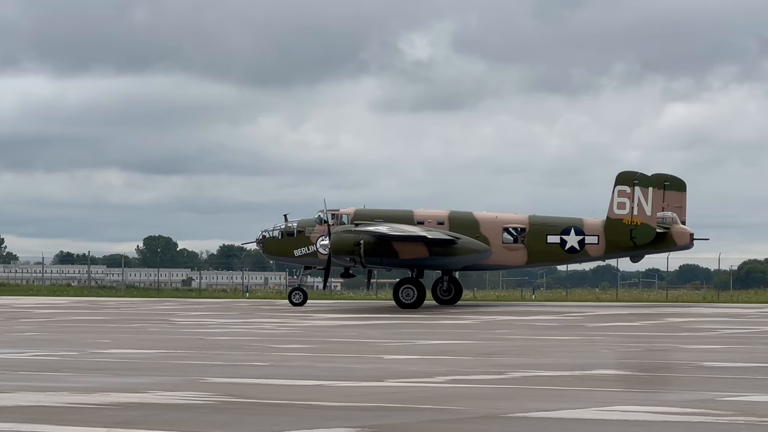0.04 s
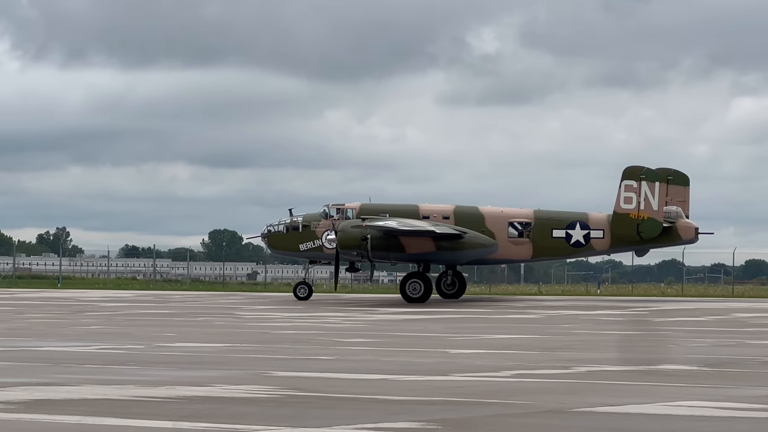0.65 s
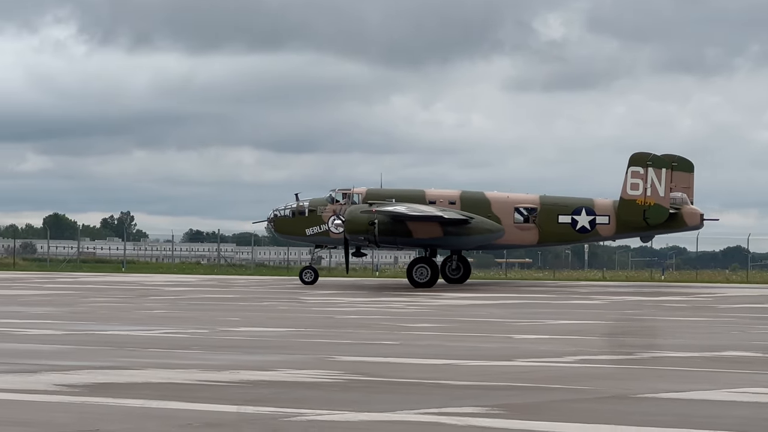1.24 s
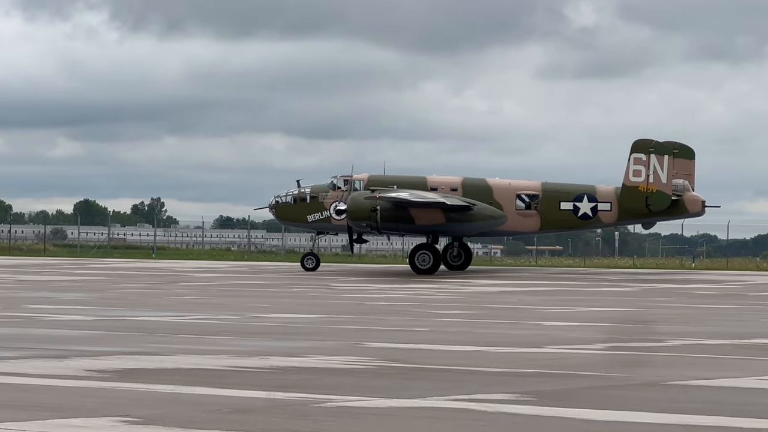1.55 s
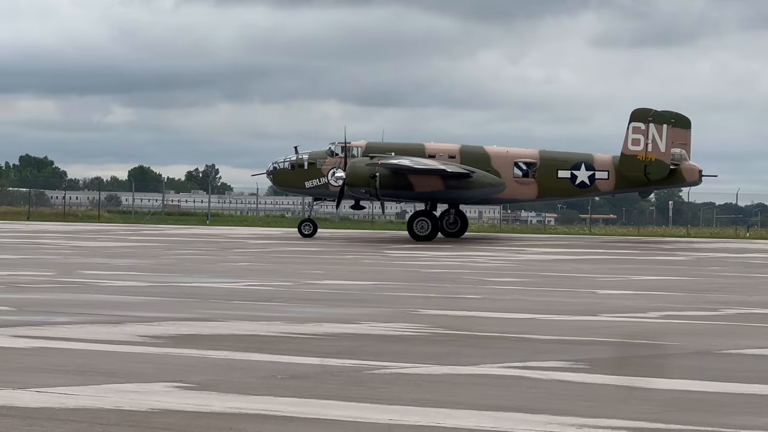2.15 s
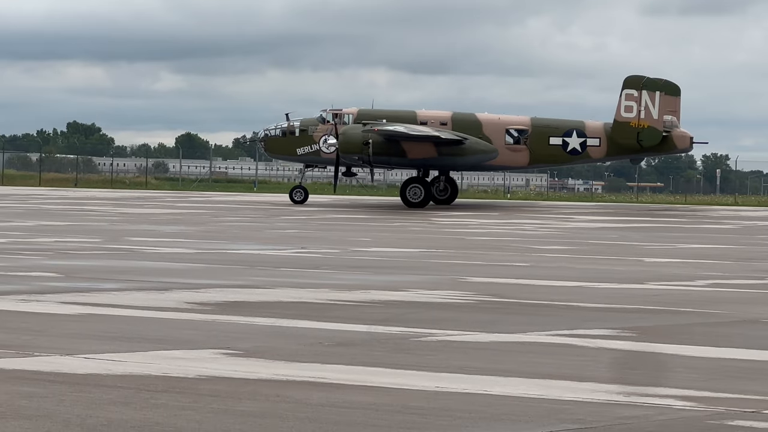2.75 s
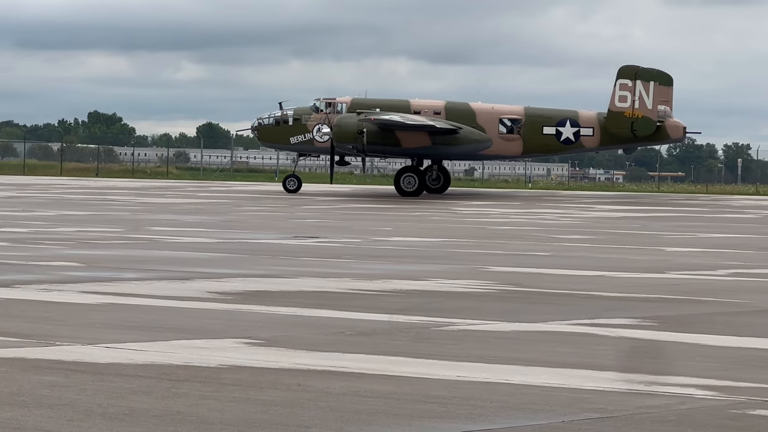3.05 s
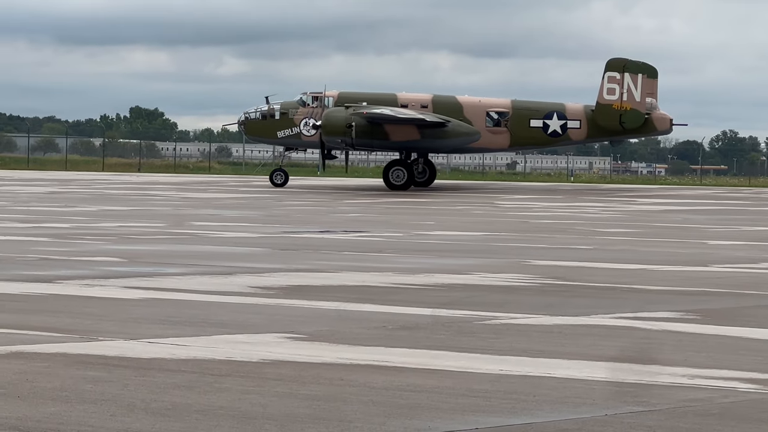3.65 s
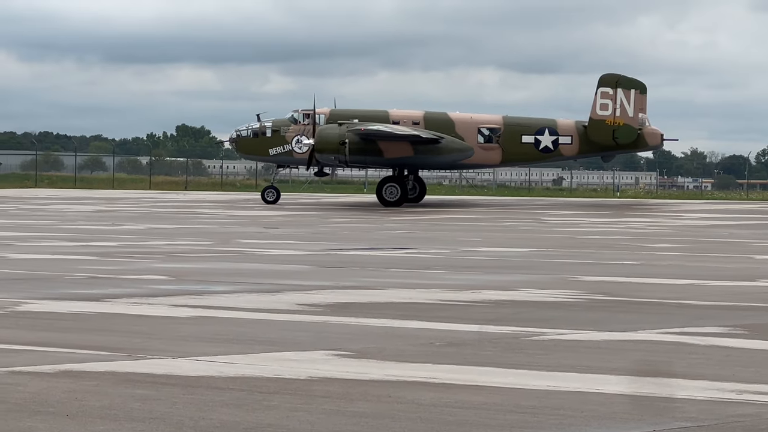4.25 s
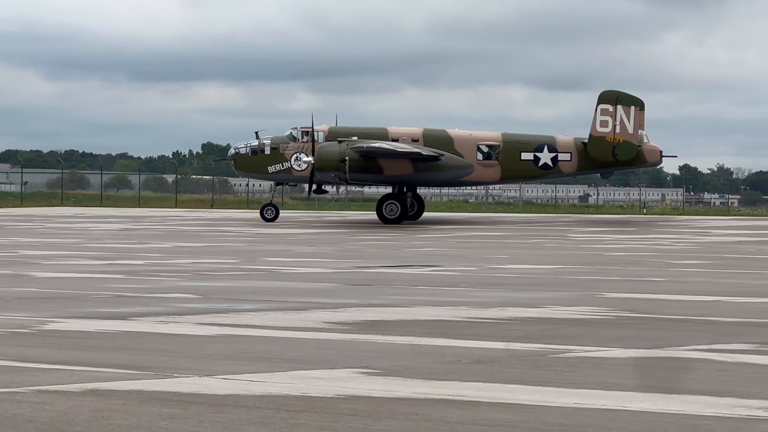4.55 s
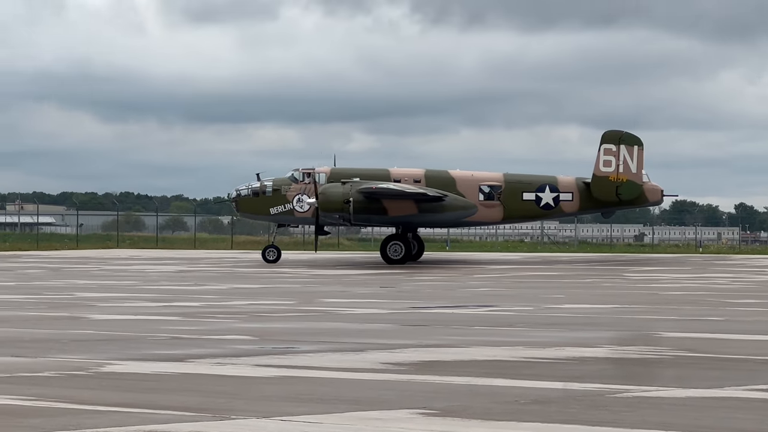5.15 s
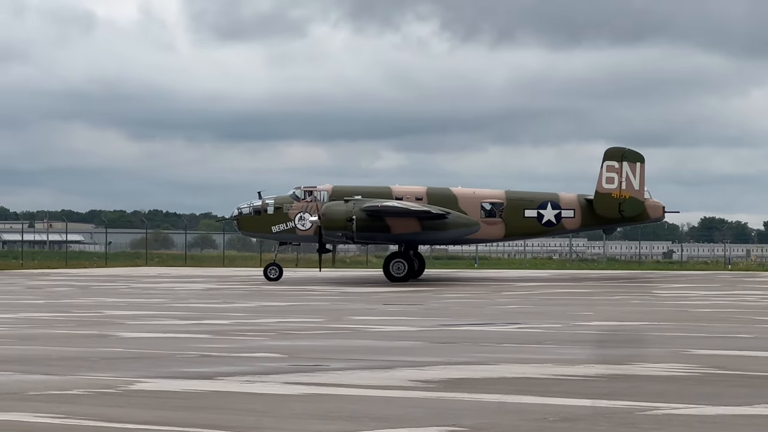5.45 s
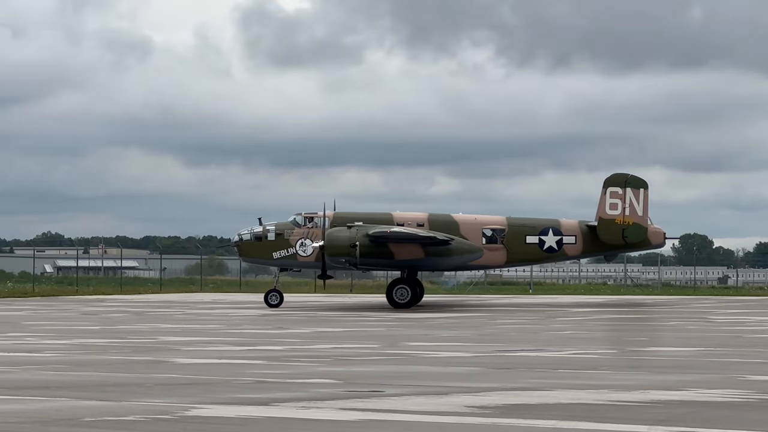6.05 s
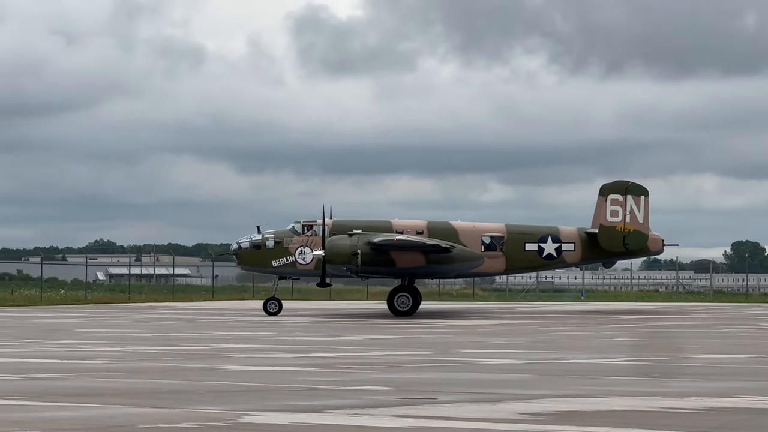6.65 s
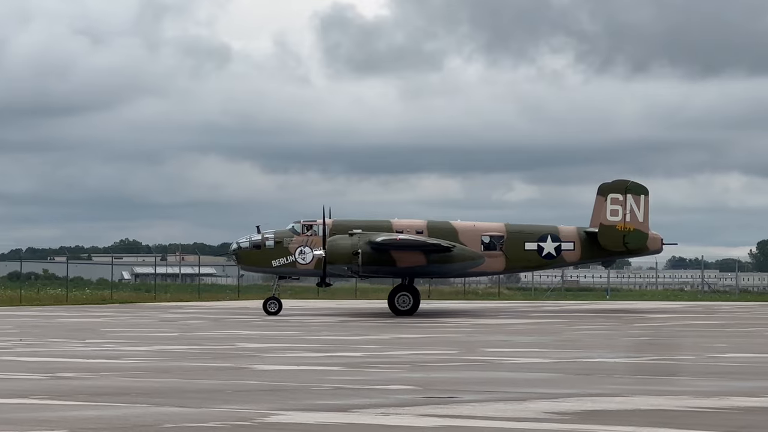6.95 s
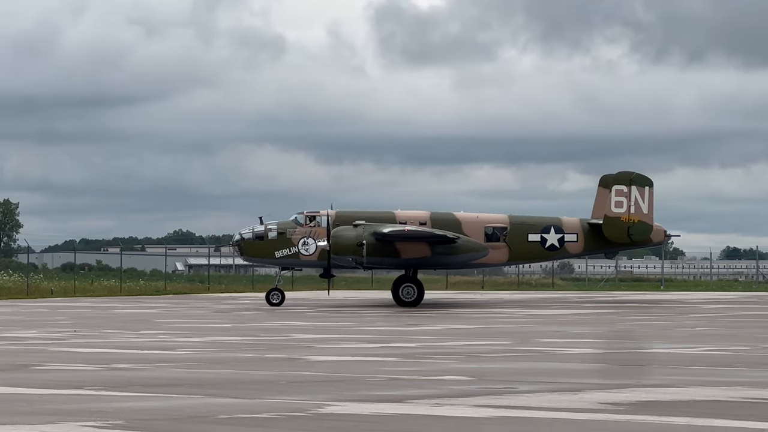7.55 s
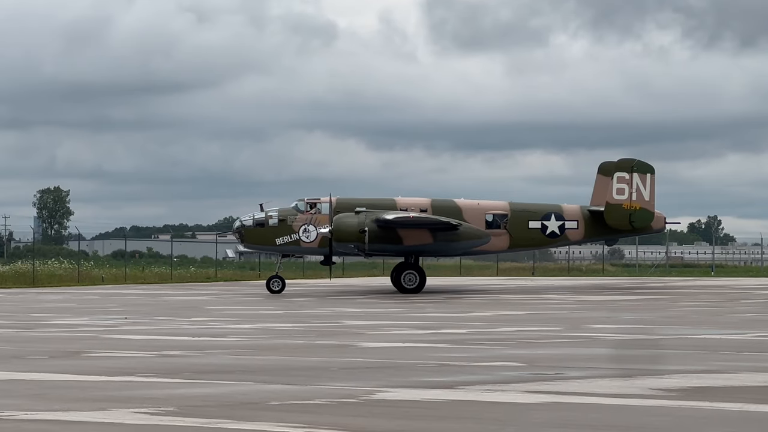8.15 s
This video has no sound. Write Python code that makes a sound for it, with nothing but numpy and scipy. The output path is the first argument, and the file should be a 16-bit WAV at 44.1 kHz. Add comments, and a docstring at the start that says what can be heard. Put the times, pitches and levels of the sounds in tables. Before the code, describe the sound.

A taxiing propeller plane idles with a loping, barking exhaust and low burble, while gusty wind thumps on the microphone.

```python
"""Two idling radial engines bark and spit in a loping beat as a propeller plane taxis slowly past.
Seven cylinders fire in turn through short exhaust pipes, over a low burble of merging pressure pulses,
throaty coughs, a light metallic clatter and churned air. A faint whine comes and goes, dull thuds
sound now and then, and unburnt fuel spits at about 1.5 seconds. Gusts of wind on the open airfield
buffet the microphone and push it into overload."""
import sys
import numpy as np
from scipy import signal
from scipy.fft import rfft, irfft
from scipy.io import wavfile
from scipy.ndimage import uniform_filter1d

SR = 44100
rng = np.random.default_rng(int(sys.argv[2]) if len(sys.argv) > 2 else 0)


def wav_out(sig):
    """Save sig, one row per channel (or a flat mono array), as 16-bit PCM at SR to the path in sys.argv[1]."""
    wavfile.write(sys.argv[1], SR, np.round(np.clip(np.atleast_2d(sig).T, -1, 1) * 32767).astype(np.int16))


N = 366471
T = np.arange(N) / SR
FIRINGS_PER_S, FIRST_FIRING_S = 33.5973, -0.0431

# The seven near cylinders in firing order. Each row: delay in seconds, bark level in dB,
# bark pitch in Hz, rasp level in dB, hiss level in dB, hiss pitch in Hz.
CYLINDERS = [(0, -29, 660, -37, -34, 7100), (.002, -33.5, 1410, -29, -34.5, 6200),
             (.002, -43, 1400, -40, -39, 6700), (.002, -47, 1030, -35.5, -51, 5600),
             (-.002, -26.5, 1020, -36.5, -31.5, 5900), (.001, -37.5, 1300, -37, -42, 6900),
             (-0.024, -69, 1100, -63, -63, 6600)]
# The idle is not quite steady. Each row: time in seconds, lag behind an even beat in seconds.
CRANK_LAG = [(0, 0.0029), (.4, 0.0004), (1, -0.008), (2, -0.0048), (3, 0.00061), (5, 0.00043), (6.4, .002),
             (7.2, -0.0041), (8.31, -0.0051)]
# The engine's sound as the plane turns. Each row: time in seconds, then the dB added to the burble,
# the bark, the rasp and the hiss.
ENGINE_LEVELS = [(0, 0.5, 7, 11, 0), (.6, 3.5, 2, -4.5, 0.5), (1.1, 0.5, -3.5, 1.5, -0.5),
                 (1.8, 2, -3, -5.5, -2), (2.4, -.5, 5.5, 1.5, 0), (3.1, 1, 2.5, -4, -0.5),
                 (3.6, -1.5, 5.5, -7, -3.5), (4.25, 3, 3, 5.5, -1), (4.6, -1, 1.5, -7, -4),
                 (5.35, -0.5, 4, -5, 3), (6, -1, 6.5, -4, -4), (6.8, 0, -0.5, -5.5, -4.5),
                 (7.3, 1.5, 7, -4, -4), (7.7, -3, 9.5, -8, 2.5), (8.31, 4, -15, -2, -2)]
# Firings that stand out. Each row: time in seconds, bark level in dB, bark pitch in Hz, crack level
# in dB, crack pitch in Hz, rasp level in dB, hiss level in dB, hiss pitch in Hz.
HARD_POPS = [(0.077, -30.5, 1280, -35, 2130, -27, -22, 6960),
             (0.168, -24.5, 1250, -25, 1804, -26, -25, 5350),
             (0.285, -27, 1168, -37, 2120, -27, -27.5, 7100),
             (0.375, -24, 1200, -37, 1985, -35, -30.5, 4870), (0.49, -33, 1173, -45, 1980, -36, -24, 7000),
             (0.583, -26, 1130, -37, 2130, -29, -22.5, 5000),
             (0.614, -31, 1170, -42, 2260, -22.5, -25.0, 7100),
             (0.697, -40, 1025, -47, 2170, -27, -28.5, 6900),
             (0.791, -23.5, 1200, -34, 1750, -31, -23, 8450),
             (0.906, -27, 1115, -38, 2230, -38.0, -30.0, 4600),
             (0.981, -28, 1158, -48, 2310, -25.5, -23.5, 8650),
             (1.112, -45.0, 1110, -46.5, 2150, -45.0, -26, 8900),
             (1.207, -22.5, 1103, -35, 2100, -36, -26, 4760),
             (1.83, -21, 1153, -33, 1870, -42.0, -32.5, 8200),
             (2.245, -22.5, 1170, -25.5, 2006, -31, -26, 7400),
             (2.278, -28, 1300, -36, 1860, -24.0, -33, 8100),
             (2.365, -30, 1190, -32.5, 1985, -30.5, -31, 7200),
             (2.457, -22, 1286, -33, 1850, -28, -29.5, 4800),
             (2.487, -31, 1317, -41, 2040, -29.5, -43, 5200), (2.664, -24, 1182, -24, 1783, -34, -26, 5030),
             (2.782, -27, 1035, -40, 1980, -38, -28.0, 6760),
             (2.875, -16, 1248, -21, 1773, -35.0, -23.5, 7900),
             (2.907, -24, 1270, -39, 1900, -40, -31, 6200),
             (3.082, -19.5, 1230, -23, 1895, -27, -36.0, 7500),
             (3.117, -25, 1213, -27.5, 1746, -29.0, -32, 6600),
             (3.2, -37, 1120, -29, 1875, -34.0, -22, 7300),
             (3.293, -22.5, 1187, -21, 1926, -26.5, -29.5, 8700),
             (3.407, -27.5, 1070, -27, 1950, -32.0, -29.5, 5660),
             (3.499, -22, 1126, -33, 2030, -36, -36, 5800), (3.535, -22.5, 1440, -23, 1772, -32, -33, 6400),
             (3.619, -24, 1170, -28, 1900, -46.0, -31, 7200),
             (3.709, -25.0, 1162, -34, 1870, -42.0, -43, 5900),
             (3.825, -24, 1170, -26.5, 1863, -34.0, -28.5, 7650),
             (3.918, -20, 1200, -22.5, 1890, -29, -27.5, 8000),
             (3.948, -29, 1240, -36, 2460, -25.5, -31.0, 8150),
             (4.033, -28, 1160, -34, 2130, -47, -26, 7350), (4.067, -32, 1356, -39, 1840, -51, -29.5, 6300),
             (4.127, -28, 1170, -24.5, 2010, -38, -30.5, 6530),
             (4.159, -37, 1140, -28, 2050, -28, -30.5, 6000),
             (4.242, -33.0, 1080, -31.0, 1980, -33, -29.5, 7300),
             (4.334, -19, 1142, -26, 1890, -30, -24.5, 8400),
             (4.365, -25, 1305, -32.0, 1850, -27.5, -27.5, 6700),
             (4.75, -30, 1080, -29, 1850, -51.0, -34, 5300),
             (4.958, -23.5, 1127, -24.5, 1905, -30.5, -30.5, 8900),
             (5.075, -26, 1110, -28.5, 1750, -37, -27.0, 5530),
             (5.167, -22, 1142, -26, 1840, -43.0, -31.5, 6200),
             (5.285, -28, 1088, -24.5, 1926, -30, -33, 5600),
             (5.376, -23, 1200, -31, 2050, -30.5, -30, 4800),
             (5.409, -39, 1200, -32.0, 1950, -31, -25.5, 5800),
             (5.493, -28, 1033, -26.5, 1870, -37, -25.5, 5860),
             (5.583, -17.5, 1113, -28.5, 2010, -41.0, -32.5, 8140),
             (5.615, -28, 1350, -36, 1974, -27, -29.5, 4530),
             (5.7, -32.0, 1120, -35, 1790, -39, -27.5, 6750),
             (5.791, -22, 1152, -31.5, 1900, -44.0, -34.0, 4800),
             (5.909, -24, 1187, -29, 1760, -45, -29.0, 5700),
             (6.118, -31, 1057, -33, 1950, -46, -29.5, 6940),
             (6.242, -35.0, 1200, -33, 2060, -30, -35, 6100),
             (6.327, -26, 1070, -30, 1895, -51.0, -29.5, 5600),
             (6.417, -23, 1162, -32, 2006, -40, -33, 7440), (6.448, -22, 1210, -33.0, 1830, -45, -39, 5750),
             (6.658, -31, 1075, -54, 1760, -36, -31.5, 7400),
             (6.745, -22, 1026, -34, 1750, -40.0, -28, 8800),
             (6.833, -23, 1030, -41, 1930, -45, -31.5, 7200),
             (6.948, -24.0, 1087, -45, 1800, -36, -34.0, 4670),
             (7.042, -19, 1294, -26, 1730, -45, -30.5, 8400),
             (7.248, -26, 1150, -27, 1800, -51, -34.5, 4700),
             (7.28, -25.0, 1256, -42, 1760, -40, -36, 4900),
             (7.456, -23, 1253, -20, 1826, -37, -30.5, 5900),
             (7.573, -24.5, 1118, -36, 2000, -47.0, -23.0, 5470),
             (7.607, -24.5, 1138, -32, 2290, -33.0, -29, 7440),
             (7.661, -21, 1155, -22.5, 1765, -44.0, -25.5, 7400),
             (7.694, -30, 1170, -31, 2200, -23.5, -26, 6400),
             (7.726, -39, 1110, -39, 2030, -29.0, -30, 9000),
             (7.779, -26, 1140, -27.5, 1890, -35.0, -26, 5300),
             (7.872, -19, 1120, -31, 1790, -37, -30.5, 7200),
             (7.904, -35.0, 1155, -45, 2130, -27.5, -35.0, 5000),
             (8.082, -25, 1180, -40, 2040, -45.0, -37.5, 6100),
             (8.196, -30, 1040, -33, 2070, -50, -21.5, 10000)]
# The notes an exhaust pipe rings with. Each row: pitch in Hz, width in Hz, level in dB.
PIPE_NOTES = [(1050, 97, -12), (1760, 130, -17)]
# The rasp as the plane turns. Each row: time in seconds, pitch in Hz.
RASP_PITCH = [(0, 3230), (1, 3390), (2.3, 3160), (3.3, 2800), (4.2, 2810), (5.3, 3230), (6.2, 3050),
              (6.9, 3600), (7.7, 3050)]
# The notes of the valve gear and engine cover. Each row: pitch in Hz, level in dB, seconds to fade 60 dB.
METAL_NOTES = [(830, -2, 0.056), (1023, 0, .055), (1156, 1, 0.06), (1405, 0.5, 0.052), (1752, -2, 0.049),
               (2166, -11, 0.052), (2550, -10, 0.053), (2963, -13.5, 0.058), (3396, -11.5, .05)]
# The throaty coughs. Each row: time in seconds, level in dB.
COUGH_LEVELS = [(0, -34), (1.2, -41), (2.2, -30), (3.3, -30.5), (4.02, -32), (4.13, -24), (4.6, -28.5),
                (4.9, -31.5), (5.2, -25.5), (5.5, -40), (7, -33), (8.31, -43)]
# The whine. Each row: time in seconds, level of its main tone in dB, level of its octave in dB.
WHINE_LEVELS = [(0, -44, -62), (1.2, -46, -62), (1.7, -47, -61), (2.3, -42, -59), (2.8, -52, -59),
                (3.7, -48.5, -51), (4.5, -56, -57), (6.2, -58, -54), (7, -59, -62), (8.31, -60, -63)]
# Gusts of wind. Each row: time of the peak in seconds, level in dB, seconds to build, seconds to die away.
GUSTS = [(1.55, -14, .18, 0.27), (1.86, -8, 0.15, 0.027), (1.915, -3.5, 0.024, 0.028),
         (2.06, -5.5, 0.078, 0.038), (2.16, -5.5, 0.057, 0.034), (2.8, -13.5, 0.048, 0.057),
         (3.1, -22, 0.17, 0.062), (3.72, -16.5, 0.22, 0.11), (4.18, -11, .014, 0.0085),
         (4.19, -14, 0.17, 0.029), (4.5, -18.5, 0.28, 0.13), (5.151, -18, 0.046, 0.087),
         (5.8, -23.5, 0.3, 0.14), (6.75, -12, 0.048, 0.015), (7.45, -13.5, 0.031, 0.057),
         (8.03, -8.5, .02, 0.044), (8.2, -2.5, 0.024, 0.021), (8.25, -7, 0.65, 0.23)]
# Dull thuds. Each row: start in seconds, level in dB, pitch in Hz, level of the air flutter in dB.
THUDS = [(0.403, -21, 386, -36), (0.818, -12.5, 350, -40), (1.468, -3, 335, -34), (1.906, 1.5, 250, -28),
         (2.065, -21, 260, -24), (2.139, -6.5, 305, -32), (2.18, -9.5, 432, -32), (2.222, -8, 298, -30),
         (2.72, -9, 396, -40), (2.829, -9.5, 347, -23.5), (3.591, -3, 286, -26), (3.944, -18, 410, -36),
         (4.046, -4.5, 380, -16), (4.083, -8, 403, -36), (4.119, -8, 335, -19), (4.143, -2, 302, -31),
         (4.158, -5, 227, -20), (4.259, -17, 440, -40), (4.361, -11.5, 480, -32), (4.387, -8.5, 315, -31),
         (4.456, -5.5, 272, -26), (4.496, -15, 221, -25), (4.629, -10.5, 423, -39), (4.653, -12, 250, -25),
         (4.8, -10, 290, -33), (5.212, -13, 340, -26), (5.615, -14.5, 395, -36), (5.842, -8, 284, -25.5),
         (6.448, -17, 424, -32), (6.799, -6.5, 245, -27), (7.437, -3, 336, -21.5), (8.189, 0, 255, -31)]
# Spits of unburnt fuel. Each row: start in seconds, level in dB, fade time in seconds.
SPITS = [(1.502, -13.5, 0.015), (1.522, -22, 0.03)]

# The tone colour of each noise. Each row: frequency in Hz, level in dB.
RASP_COLOUR = [(1500, -30), (2300, -6), (3100, 6), (3700, 2), (4400, 5), (6000, -32)]  # the rasping pipe
JET_COLOUR = [(1500, -4), (3500, -9), (4600, 0.5), (5500, 3), (6600, 0.5), (7700, 4), (8600, -2),
              (10000, 1), (11800, -12), (14500, -14.5), (16000, -26)]  # gas rushing past a valve
BURBLE_COLOUR = [(20, -41.5), (32, -32), (45, -9), (58, 2), (85, -5), (120, -6.5), (170, -6), (260, -6.5),
                 (400, -11.5), (550, -22), (800, -25), (1500, -56.5), (4000, -61)]  # the rumble of both engines
WASH_COLOUR = [(200, -5.5), (500, 1.5), (800, 3.5), (1100, 2), (1500, -2.5), (1800, -1.5), (2300, -22),
               (3500, -25), (8000, -37)]  # air churned by the propellers
FAR_HISS_COLOUR = [(1200, -11), (2300, 7.5), (3100, 4.5), (3800, 2.5), (4600, -0.5), (6200, 2.5),
                   (7700, 0.5), (8600, -5), (10000, -4), (11800, -23), (14500, -41), (16000, -30)]  # distant exhaust
WIND_COLOUR = [(20, -31), (32, -27), (52, 0.5), (80, -0.5), (130, -3), (190, -8.5), (280, -16.5),
               (420, -27.5), (800, -43.5), (3000, -78)]  # swirls at the microphone
SPIT_COLOUR = [(300, 14), (1100, 6.5), (2200, 4.5), (4000, -10), (7600, 2.5), (10500, -8), (13000, -10),
               (16000, -12)]  # sizzling fuel

# How alike the left and right channels are. Each row: frequency in Hz, likeness from 0 to 1.
STEREO_LIKENESS = [(20, .9), (55, .97), (100, .87), (300, .94), (750, .8), (1200, .94), (1800, .995),
                   (2500, .994), (2900, .94), (3500, .94), (4200, .97), (4900, .994), (6500, .994),
                   (7200, .86), (8000, .99), (8500, .99), (9000, .84), (10400, .85), (11000, .99),
                   (13000, .98), (14500, .5)]
# How far the left channel runs ahead. Each row: frequency in Hz, lead in radians.
LEFT_LEAD = [(20, 0), (150, .12), (450, 0), (750, -.27), (1200, -.2), (1700, 0), (2500, .03), (3050, .33),
             (3500, .2), (4200, 0), (6700, 0), (7000, .7), (7350, 1.3), (7700, 2.7), (8000, 3.1),
             (8550, 3.14), (9100, 1.6), (9500, 1), (10150, .9), (10900, 0), (13200, 0), (15500, -2.4)]
# The balance of the channels. Each row: frequency in Hz, left minus right in dB.
BALANCE = [(30, .3), (250, 0.69), (550, .5), (1000, -0.13), (2000, 0.043)]


def gain_of(db):
    """Turns decibels into a number to multiply by."""
    return 10 ** (np.asarray(db) / 20)


def evened(x):
    """Scales a signal to an average (rms) level of 1."""
    return x / np.sqrt(np.mean(x ** 2) + 1e-20)


def evened_pop(x):
    """Gives each strand of a short sound the energy of 10 ms at level 1."""
    return x / np.sqrt((x ** 2).sum(1, keepdims=True) / (SR / 100))


def read(points, hz):
    """Looks up a frequency table, gliding between rows on a scale of octaves."""
    f, value = np.transpose(points)
    return np.interp(np.log(hz + 1), np.log(f), value)


def curve(rows, column=1):
    """One column of a time table, at every sample."""
    rows = np.asarray(rows)
    return np.interp(T, rows[:, 0], rows[:, column])


def add(mix, s, sound):
    """Mixes a sound in at s seconds."""
    at = round(s * SR)
    sound = sound[..., max(-at, 0):]
    part = mix[..., max(at, 0):][..., :sound.shape[-1]]
    part += sound[..., :part.shape[-1]]


def colour(x, points, size=8192):
    """Gives a sound a tone colour, with a filter that never rings ahead of it; the result has level 1."""
    log_gain = np.log(gain_of(read(points, abs(np.fft.fftfreq(size, 1 / SR)))))
    taps = np.fft.ifft(np.exp(np.conj(signal.hilbert(log_gain)))).real[:size // 2]
    return evened(signal.oaconvolve(x, taps[None], axes=1)[:, :N])


def noise(points):
    """Two unrelated strands of coloured noise."""
    return colour(rng.standard_normal((2, N)), points)


def drift(hz):
    """A random wobble of level 1, with up to about hz swings a second."""
    steps = np.arange(0, N / SR + .002, .001)
    f = np.fft.rfftfreq(len(steps), steps[1])
    slow = rfft(rng.standard_normal(len(steps))) * np.exp(-(f / hz) ** 2)
    return evened(np.interp(T, steps, irfft(slow, len(steps))))


def peak(f, hz, width_hz):
    """How strongly something that rings at hz answers each frequency f."""
    return 1 / (1 + 2j * (f - hz) / width_hz)


def puff(t, rise_s, fall_s, tail_db, tail_s):
    """Loudness as a valve opens: a swell around t = 0, then a weak tail scattered by wing and ground."""
    swell = np.exp(-.5 * (t / np.where(t < 0, rise_s, fall_s)) ** 2)
    tail = (t > 0) * gain_of(tail_db) * np.exp(-abs(t) / tail_s)
    return np.maximum(swell, tail)


def burst(envelope, response):
    """A short rush of swirling gas, coloured by whatever it rings in."""
    rush = rng.standard_normal((2, len(envelope))) * envelope
    return evened_pop(irfft(rfft(rush) * response, len(envelope)))


def firings(spread_db=3, jitter_s=.00089, bark_limit_db=-27, rasp_limit_db=-29):
    """Lists the pops, laid out like HARD_POPS: cylinders fire in turn, never twice alike, some hard."""
    hard = {round((pop[0] - FIRST_FIRING_S) * FIRINGS_PER_S): pop for pop in HARD_POPS}
    lag = curve(CRANK_LAG)
    barking, rasping, hissing = (curve(ENGINE_LEVELS, column) for column in (2, 3, 4))
    pops = []
    for k, beat in enumerate(np.arange(FIRST_FIRING_S, N / SR, 1 / FIRINGS_PER_S)):
        late_s, bark_db, bark_hz, rasp_db, hiss_db, hiss_hz = CYLINDERS[k % len(CYLINDERS)]
        late, bark, crack, rasp, hiss, pitch, edge, sharp = np.clip(rng.standard_normal(8), -2, 2)
        at = max(int(beat * SR), 0)
        s = beat + lag[at] + late_s + jitter_s * late
        bark_db = min(bark_db + barking[at] + spread_db * bark, bark_limit_db)
        bark_hz *= np.exp(.0605 * pitch)
        crack_db = bark_db - 9 + 5.5 * crack
        crack_hz = 1850 * np.exp(.124 * edge)
        rasp_db = min(rasp_db + rasping[at] + spread_db * rasp, rasp_limit_db)
        hiss_db += hissing[at] + spread_db * hiss
        hiss_hz *= np.exp(.23 * sharp)
        pops.append(hard.get(k, (s, bark_db, bark_hz, crack_db, crack_hz, rasp_db, hiss_db, hiss_hz)))
    return pops


def blast(t, hz, swell_s, sag):
    """The gas in the pipe swings a few times, falling in pitch as the pressure drops."""
    angle = 2 * np.pi * np.cumsum(hz * (1 - sag * np.tanh(t / swell_s / 2))) / SR
    swell = np.exp(-.5 * (t / swell_s) ** 2)
    return evened_pop(swell * np.sin(angle + 2 * np.pi * rng.random((2, 1))))


def pipe(f, hz, width_hz=200, body_db=-19):
    """A short exhaust pipe rings with one hollow note at hz, as well as its own unchanging notes."""
    power = abs(peak(f, hz, width_hz)) ** 2 + gain_of(body_db) ** 2
    for note_hz, note_width_hz, db in PIPE_NOTES:
        power = power + abs(gain_of(db) * peak(f, note_hz, note_width_hz)) ** 2
    return np.sqrt(power) / (1 + (f / 2200) ** 14) / (1 + (930 / (f + 1)) ** 12)  # trim highs and lows


def exhaust(pops, bark_rough=.7, crack_rough=.72, snap=.64, echo_db=-11, hiss_peak_db=7):
    """At each firing, gas snaps and hisses past the opening valve, then the pipe cracks, barks and rasps."""
    t = np.arange(-768, 3328) / SR
    f, out = np.fft.rfftfreq(len(t), 1 / SR), np.zeros((2, N))
    rasp_shape = puff(t + .0005, rise_s=.0029, fall_s=.0046, tail_db=-4.5, tail_s=.023)
    hiss_shape = puff(t + .0024, rise_s=.003, fall_s=.0046, tail_db=-21, tail_s=.071)
    # the jet snaps at its height, and the plane's body throws it back a moment later
    hiss_shape *= 1 + snap * np.exp(-abs(t + .001) / .0007)
    hiss_shape += gain_of(echo_db) * np.exp(-abs(t - .0095) / .002)
    rasp_band, jet_band = gain_of(read(RASP_COLOUR, f)), gain_of(read(JET_COLOUR, f))
    treble = np.clip((f - 7000) / 5000, 0, 1)
    for s, bark_db, bark_hz, crack_db, crack_hz, rasp_db, hiss_db, hiss_hz in pops:
        # no two pops last as long or trail off alike
        length, tail, pitch = np.clip(rng.standard_normal(3), -1.5, 1.5)
        own_t, more_db = t / np.exp(.19 * length), 2.5 * tail
        bark_shape = puff(own_t - .0005, rise_s=.003, fall_s=.004, tail_db=-8 + more_db, tail_s=.014)
        crack_shape = puff(own_t + .001, rise_s=.0025, fall_s=.003, tail_db=-7 + more_db, tail_s=.012)
        # the pressure front cracks first and the lower bark follows; each is part tone, part noise
        bark_tone = blast(own_t - .0008, bark_hz, swell_s=.0023, sag=.13)
        crack_tone = blast(own_t + .0005, crack_hz, swell_s=.0018, sag=.15)
        bark_noise = burst(bark_shape, pipe(f, bark_hz))
        crack_noise = burst(crack_shape, peak(f, crack_hz, width_hz=800) ** 2)
        bark = np.sqrt(1 - bark_rough ** 2) * bark_tone + bark_rough * bark_noise
        crack = np.sqrt(1 - crack_rough ** 2) * crack_tone + crack_rough * crack_noise
        rasp_hz = np.interp(s, *np.transpose(RASP_PITCH)) * np.exp(.083 * pitch)
        rasp = burst(rasp_shape, rasp_band * peak(f, rasp_hz, width_hz=480))
        bright = gain_of(.18 * (hiss_db + 30) * treble)  # a harder jet is brighter
        hiss_peak = 1 + gain_of(hiss_peak_db) * peak(f, hiss_hz, width_hz=900)
        hiss = burst(hiss_shape, jet_band * bright * hiss_peak)
        add(out, s + t[0], gain_of(bark_db - .5) * bark + gain_of(crack_db) * crack
            + gain_of(rasp_db) * rasp + gain_of(hiss_db) * hiss)
    return out


def clatter(level_db=-36.5, taps_per_s=330, uneven_db=3, detune=.05, rise_s=.0006):
    """Many light metallic taps, perhaps valve gear and engine cover; each briefly rings one note."""
    out, t = np.zeros((2, N)), np.arange(1536) / SR
    attack = 1 - np.exp(-t / rise_s)
    for when, which, force, pitch, phase, other_phase in rng.random((int(taps_per_s * N / SR), 6)):
        hz, db, fade_s = METAL_NOTES[int(which * len(METAL_NOTES))]
        strength = gain_of(db + uneven_db * min(-np.log(1 - force), 2))
        envelope = attack * strength * np.exp(-np.log(1000) * t / fade_s)
        turns = hz * (1 + detune * (2 * pitch - 1)) * t + np.array([[phase], [other_phase]])
        add(out, when * N / SR, envelope * np.sin(2 * np.pi * turns))
    return gain_of(level_db) * evened(out)


def chug(pops, depth=.5, wander_db=1.8, full_db=-27):
    """The rumble surges with each loud pop, and lopes a little by chance."""
    t, surge = np.arange(-2048, 4096) / SR, np.ones(N)
    shape = puff(t, rise_s=.007, fall_s=.009, tail_db=-24, tail_s=.017)
    for s, bark_db, *_ in pops:
        add(surge, s + t[0], depth * min(gain_of(bark_db - full_db), 1) ** 2 * shape)
    return surge * gain_of(wander_db * drift(12.4))


def burble(pops, far_per_s=51, far_db=-2, uneven_db=3.5, jitter_s=.003024, churn_db=-4, level_db=-20):
    """Uneven pressure pulses from the cylinders of both engines merge into a low rumble."""
    pulses, t = np.zeros((2, N)), np.arange(2048) / SR
    smear = np.exp(-t / .0054)  # each pulse reaches the ground by many paths round engine cover and wing
    for rate, engine_db in ((2 * FIRINGS_PER_S, 0), (far_per_s, far_db)):
        late, force = rng.standard_normal((2, 640))
        blasts = rng.standard_normal((len(late), 2, len(t)))
        for k in range(len(late)):
            size = gain_of(engine_db + uneven_db * np.clip(force[k], -2, 1))
            add(pulses, k / rate + jitter_s * late[k], size * blasts[k] * smear)
    rumble = evened(colour(pulses, BURBLE_COLOUR) + gain_of(churn_db) * noise(BURBLE_COLOUR))
    return gain_of(level_db + curve(ENGINE_LEVELS)) * evened(rumble * chug(pops))


def coughs(hz=455, width_hz=170, pitch_spread=.2, uneven_db=4, jitter_s=.00516, fade_s=.0049):
    """Throaty coughs, perhaps from the far engine: one per firing, each with its own strength and pitch."""
    out, t = np.zeros((2, N)), np.arange(2048) / SR
    f, level_db = np.fft.rfftfreq(len(t), 1 / SR), curve(COUGH_LEVELS)
    for beat in np.arange(0, N / SR, 1 / FIRINGS_PER_S):
        late, force, pitch = np.clip(rng.standard_normal(3), -2, 1.5)
        cough = burst(np.exp(-t / fade_s), peak(f, hz * np.exp(pitch_spread * pitch), width_hz) ** 2)
        add(out, beat + jitter_s * late, gain_of(level_db[int(beat * SR)] + uneven_db * force) * cough)
    return out


def patchy(x, patch_db):
    """Swirling air changes its tone colour from one moment to the next."""
    slices = signal.stft(x, nperseg=512)[2]
    patches = uniform_filter1d(rng.standard_normal(slices.shape[1:]), size=4, axis=0)
    patches = evened(uniform_filter1d(patches, size=4, axis=1))
    return evened(signal.istft(slices * gain_of(patch_db * patches), nperseg=512)[1][:, :N])


def propellers(wash_db=-36, hiss_db=-39, flutter_db=4):
    """Churned air and distant exhaust hiss flutter under the pops, following the bark and hiss levels."""
    wash = gain_of(wash_db + .32 * curve(ENGINE_LEVELS, 2)) * patchy(noise(WASH_COLOUR), patch_db=2)
    hiss = gain_of(hiss_db + .88 * curve(ENGINE_LEVELS, 4)) * patchy(noise(FAR_HISS_COLOUR), patch_db=1)
    return (wash + hiss) * gain_of(flutter_db * drift(35))


def whine(hz=3096, waver=.0011, wander=.0006, flicker_db=1.8):
    """A thin ring and its octave, perhaps from a dragging brake."""
    angle = 2 * np.pi * np.cumsum(hz * (1 + waver * drift(40) + wander * drift(3))) / SR
    tone = gain_of(curve(WHINE_LEVELS, 1) + flicker_db * drift(9.5)) * np.sin(angle)
    octave = gain_of(curve(WHINE_LEVELS, 2) + flicker_db * drift(14)) * np.sin(2 * angle)
    return np.array([tone + octave, np.zeros(N)])


def gusts(breeze_db=-23, calm_db=-6, freshen_s=1, restless_db=3.5, restless_hz=5):
    """The wind's level in dB: gusts build and die away over a restless breeze that picks up at first."""
    power = gain_of(breeze_db + calm_db * np.exp(-T / freshen_s) + restless_db * drift(restless_hz)) ** 2
    for s, db, build_s, die_s in GUSTS:
        power = power + gain_of(db) ** 2 * np.exp(-((T - s) / np.where(T < s, build_s, die_s)) ** 2)
    return 10 * np.log10(power)


def wind(depth=.26, deep_hz=110):
    """Air swirls at the microphone, making a boom that follows the gusts and deepens as they grow."""
    gust_db, swirls = gusts(), noise(WIND_COLOUR)
    deep = signal.sosfilt(signal.butter(2, deep_hz, fs=SR, output="sos"), swirls)
    swirls = swirls + depth * gain_of(gust_db - gust_db.max()) * evened(deep)
    local_power = abs(uniform_filter1d(swirls ** 2, size=3000, axis=1))
    steadied = evened(swirls / local_power ** (1 / 3))  # tame chance swells so the gusts lead
    return gain_of(gust_db) * steadied


def thuds(level_db=-2, ring_s=.0024, sag=.16, flutter_hz=600, flutter_s=.0042):
    """Hollow knocks of two or three swings, falling in pitch, each with a brief flutter of air."""
    out, t = np.zeros((2, N)), np.arange(4096) / SR
    age, f = t / ring_s, np.fft.rfftfreq(len(t), 1 / SR)
    for s, db, hz, air_db in THUDS:
        angle = 2 * np.pi * np.cumsum(hz * (1 + sag * np.exp(-age / 2))) / SR
        knock = age * np.exp(1 - age) * np.sin(angle + 2 * np.pi * rng.random((2, 1)))
        flutter = burst(np.exp(-t / flutter_s), peak(f, flutter_hz, width_hz=420) ** 2)
        add(out, s - .001, gain_of(db + level_db) * knock + gain_of(air_db) * flutter)
    return out


def afterfire():
    """Unburnt fuel cracks at the mouth of the pipe and sizzles out."""
    envelope = sum(gain_of(db) * (T > s) * np.exp(-abs(T - s) / fade_s) for s, db, fade_s in SPITS)
    return envelope * noise(SPIT_COLOUR)


def scene():
    """Mixes the sounds' two strands: the first goes to both channels alike, the second with opposite signs."""
    pops = firings()
    plane = exhaust(pops) + clatter() + burble(pops) + coughs() + propellers() + whine() + afterfire()
    shared, apart = rfft(plane + thuds() + wind())
    hz = np.fft.rfftfreq(N, 1 / SR)
    likeness = np.clip(read(STEREO_LIKENESS, hz), 0, 1)
    shared, apart = shared * np.sqrt((1 + likeness) / 2), apart * np.sqrt((1 - likeness) / 2)
    lean_left = np.exp(.5j * read(LEFT_LEAD, hz)) * gain_of(read(BALANCE, hz) / 2)
    return irfft(np.array([(shared + apart) * lean_left, (shared - apart) / lean_left]), N)


def record(dry):
    """The microphone overloads, flattening the loudest peaks; then treble above 15750 Hz is cut."""
    clipped = dry / (1 + dry ** 8) ** (1 / 8)
    treble_cut = signal.firwin(511, 15750, window=("kaiser", 9), fs=SR)
    return signal.oaconvolve(clipped, treble_cut[None], "same")


dry = scene()
out = record(dry)
wav_out(out)
```